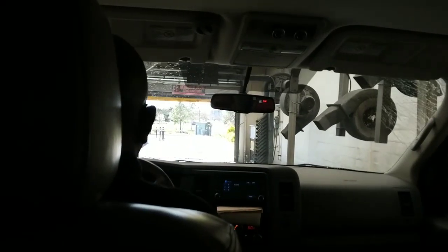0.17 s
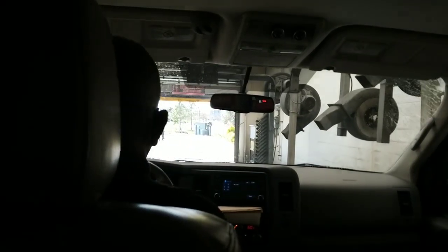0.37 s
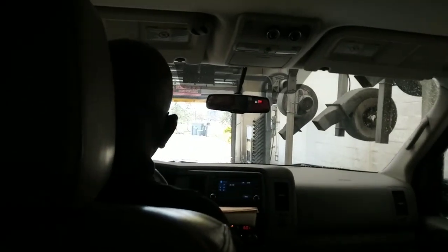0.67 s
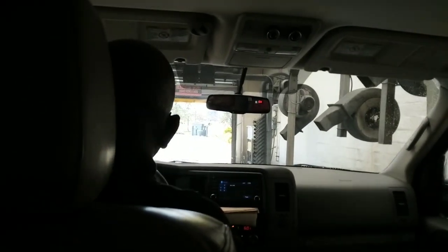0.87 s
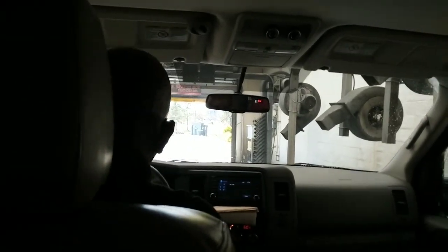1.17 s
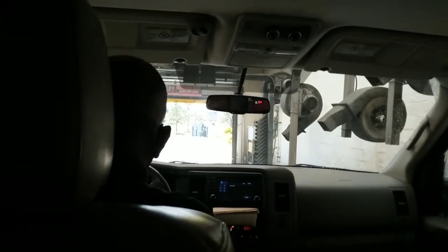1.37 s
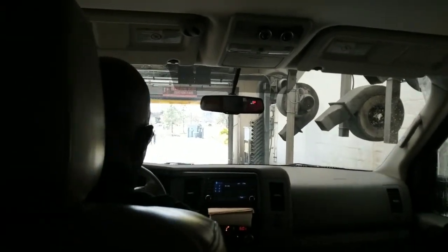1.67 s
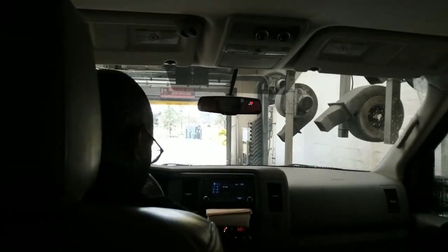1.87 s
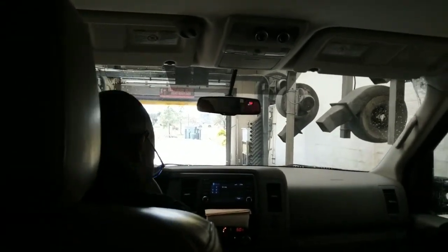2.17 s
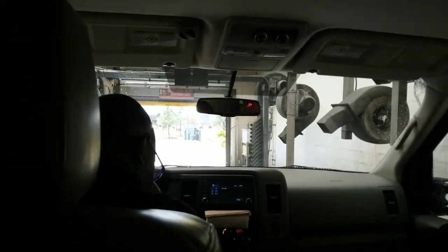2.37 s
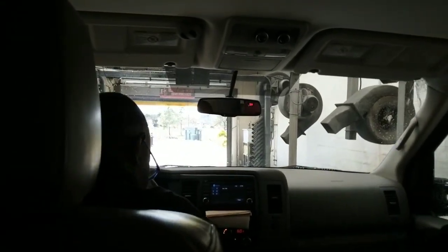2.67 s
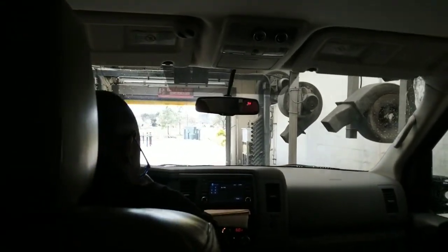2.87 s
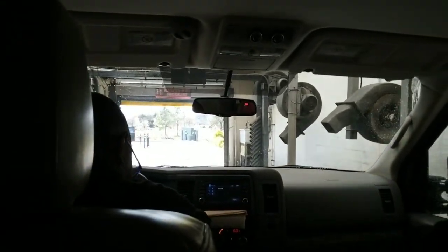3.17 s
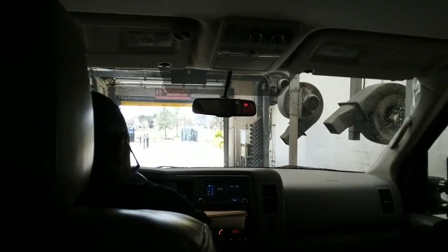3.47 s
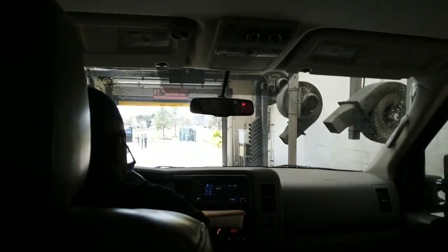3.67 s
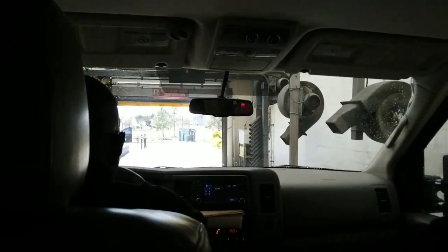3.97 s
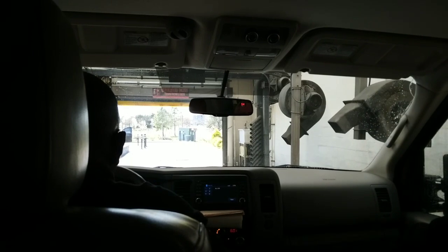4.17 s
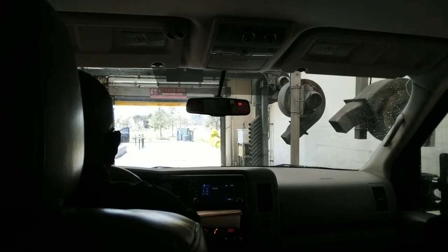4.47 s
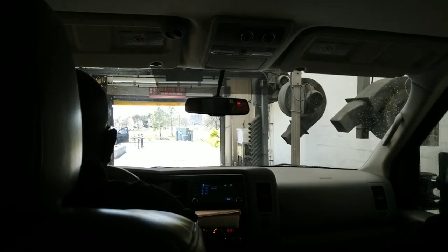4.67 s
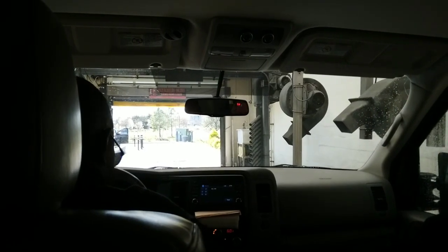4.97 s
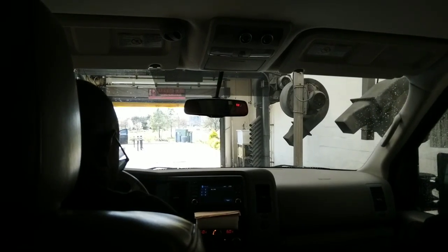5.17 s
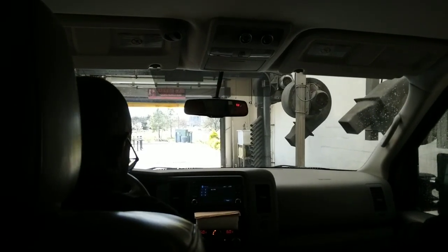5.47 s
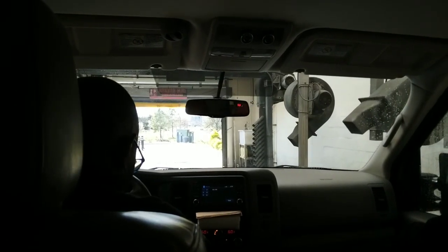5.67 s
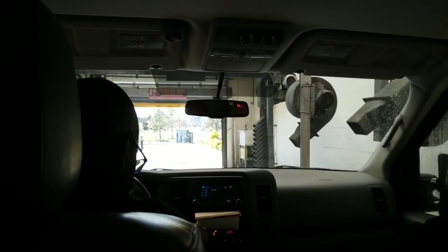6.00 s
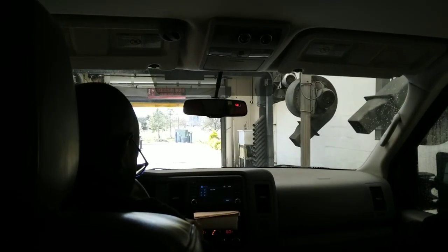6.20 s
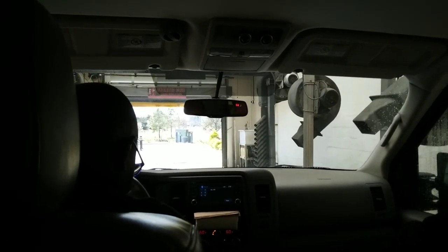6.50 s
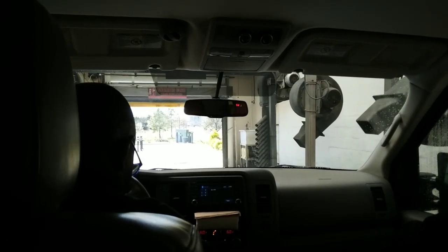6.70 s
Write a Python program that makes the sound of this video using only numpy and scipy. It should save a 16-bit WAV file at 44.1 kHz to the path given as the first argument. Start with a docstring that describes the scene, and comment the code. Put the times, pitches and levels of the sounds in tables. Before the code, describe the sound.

Large car wash dryer blowers roar without a break, heard from the back seat of a closed car. The sound is deep and muffled: air drums on the body and booms in the cabin, with a wavering fan hum and a much softer hiss through the glass. A faint high whistle slides up and fades between about 0.2 and 0.6 seconds. Gusts make the cabin air throb, most strongly around 1 and 1.7 seconds. Loose plastic trim rattles lightly in short, slightly squeaky bursts from about 0.6 seconds, busiest between 3 and 4.5 seconds. Something small ticks faintly and irregularly on the left throughout. The roar eases a little through the middle and dips briefly near 4.9 seconds. From about 6 seconds it swells with more throbs and is loudest at the end, near 6.8 seconds.

```python
"""Dryer blowers of a tunnel car wash roar over a closed car, heard by a phone on the back seat.
Their air jets drum on the body, boom in the cabin and hiss through the glass; the fan blades hum.
A faint whistle comes and goes, gusts make the cabin air throb, something small ticks on the left,
and loose trim rattles in bursts. The phone turns down the loudest swells."""
import sys
import numpy as np
from scipy import signal
from scipy.fft import rfft, irfft, next_fast_len
from scipy.io import wavfile
from scipy.ndimage import uniform_filter1d, minimum_filter1d

SR = 44100
rng = np.random.default_rng(int(sys.argv[2]) if len(sys.argv) > 2 else 0)


def log_audio(samples):
    """Write samples as a 16-bit WAV file to the path given in sys.argv[1]."""
    # one column per channel
    frames = np.atleast_2d(samples).T
    # limit to full scale, then quantise
    limited = np.clip(frames, -1, 1)
    pcm = np.round(limited * 32767).astype(np.int16)
    wavfile.write(sys.argv[1], SR, pcm)


N = 301644

# the car creeps through the jets: t/s, boom level/dB, roar level/dB, hiss level/dB
JET_LEVELS = [(0.0, -13.5, -14, -42), (0.2, -15, -13, -41.5), (0.45, -11.5, -10, -40.5),
              (0.75, -13, -10, -42), (1.0, -11.5, -7.5, -39.5), (1.45, -12.5, -9, -40.5),
              (1.8, -11.5, -9.5, -39.5), (2.2, -14, -11.5, -39.5), (2.7, -14, -11, -40.5),
              (3.0, -14.5, -12, -39), (3.4, -13.5, -11, -38), (4.2, -14.5, -13.5, -38.5),
              (4.8, -14, -12.5, -38.5), (4.92, -16.5, -17.5, -39.5), (5.05, -15, -12, -38.5),
              (5.5, -14.5, -13.5, -38.5), (5.65, -13.5, -10, -39), (6.0, -15.5, -10.5, -38.5),
              (6.35, -12.5, -7, -37.5), (6.8, -9, -5, -35)]
# slow swells above and below the roar: t/s, drone level/dB, rumble level/dB
SLOW_SWELLS = [(0, -28.5, -24), (.5, -24.5, -25.5), (1.0, -21.5, -26.5), (1.35, -24, -26),
               (1.7, -23.5, -24.5), (2.3, -24.5, -24), (2.9, -24.5, -23), (3.6, -23, -23.5),
               (4.2, -24.5, -25), (4.8, -25.5, -25.5), (5.3, -25.5, -21.5), (5.7, -24, -21.5),
               (6.1, -22.5, -26.5), (6.5, -20, -22), (6.84, -19.5, -24.5)]
# resonances (favourite pitches) of the cabin and of the panels: f/Hz, width/Hz, level/dB
CABIN_BOOM = [(97, 32, 0), (81, 16, -6), (113.4, 20, -4)]
PANEL_ROAR = [(142.8, 24, -1), (159.8, 24, -1), (192.8, 36, 0), (238.7, 28, -4), (284.7, 44.2, -5),
              (324.9, 37, -9)]
# tone colours of the deep rumble, dull drone and bright hiss: f/Hz, level/dB
RUMBLE_COLOUR = [(8.8, -43.5), (15, -15), (24, -9), (32, -5.5), (54, -6.5), (70, -4), (91, -31.5),
                 (150, -120)]
DRONE_COLOUR = [(200, -31), (340, -3), (404, -6.5), (461, -6.5), (556, -10), (693, -11), (852, -18),
                (1100, -37.5), (1430, -56.5), (2420, -120)]
HISS_COLOUR = [(600, -28.5), (900, -4), (1080, -3.5), (1400, -5.5), (1700, -8), (2400, -12), (2800, -13.5),
               (3400, -13), (3800, -15.5), (4190, -19), (5740, -26.5), (6610, -28.5), (8210, -34),
               (9660, -46), (11500, -55.5), (15500, -58.5)]
# how alike the two microphones sound: f/Hz, likeness (-1 to 1)
MIC_LIKENESS = [(25, .99), (60, .985), (130, .95), (290, .83), (640, .47), (1100, 0), (1600, -.05),
                (3100, .07), (6800, -.05), (12000, .3)]
# how much louder the left one is: f/Hz, level/dB
LEFT_EXTRA = [(30, 0), (80, 0), (130, .9), (250, -.6), (700, -.4), (1300, -1.5), (2400, .8), (4400, 1.5),
              (6600, 4), (9000, -1)]
# the fan blades' tone and its octave: f/Hz, level/dB halfway through
BLADE_TONES = [(467.5, -35.5), (936, -57)]
# strongest throbs of the cabin air: t/s of the peak, f/Hz, level/dB
AIR_THROBS = [(.42, 97.3, -6.5), (.51, 91.8, -9), (.72, 87, -9.5), (.91, 100.4, -5.5), (1.02, 98.8, -3),
              (1.27, 182, -6.5), (1.4, 104, -9), (1.55, 95.8, -8.5), (1.65, 140.5, -8.5), (1.72, 96.5, -3),
              (2.0, 94.3, -8.5), (2.17, 98, -7.5), (2.56, 92.3, -10), (2.9, 96, -8), (3.08, 86, -10.5),
              (3.479, 110.4, -12.5), (3.66, 84, -11), (3.9, 148.7, -8.5), (4.33, 84.5, -10),
              (5.62, 90, -11.5), (5.92, 97, -10.5), (6.06, 100, -6), (6.21, 99.4, -9.5), (6.34, 95.7, -3),
              (6.65, 98.3, -7)]
# loudest ticks: t/s, level/dB
LOUD_TICKS = [(0.4305, -42), (0.8725, -47), (1.0311, -36), (1.0511, -40), (1.1598, -45), (1.172, -34),
              (1.297, -38), (1.3728, -43), (1.563, -35), (1.7145, -39), (1.8098, -39), (1.9151, -38),
              (2.3262, -43), (2.4145, -43), (2.439, -37), (2.61, -38), (2.7851, -40), (2.7981, -34),
              (3.0485, -38), (3.2017, -40), (3.2645, -39), (3.2895, -37), (3.485, -35), (3.5903, -36),
              (3.6302, -44), (3.712, -41), (4.2463, -44), (4.3211, -40), (4.7621, -44), (4.7746, -37),
              (4.8365, -47), (5.0579, -38), (5.0994, -40), (5.3438, -38), (5.5977, -39), (5.6616, -46),
              (5.6965, -41), (5.7813, -41), (5.907, -39), (5.9549, -41), (5.9998, -38), (6.0687, -39),
              (6.15, -41), (6.1654, -37), (6.2248, -41), (6.2383, -36), (6.2687, -37), (6.3316, -38),
              (6.361, -34), (6.4004, -38), (6.5381, -38), (6.5528, -33), (6.6723, -38), (6.7072, -37),
              (6.7376, -33)]
# bursts of rattling: t/s, shake level/dB, clear ring level/dB
RATTLE_BURSTS = [(0.6494, -48, -49), (0.8, -49, -41), (0.887, -43.5, -40), (0.909, -49, -38),
                 (0.975, -55, -48), (1.052, -43, -40), (1.067, -46, -46), (1.081, -46, -46),
                 (1.102, -42, -37), (1.17, -49.5, -38), (1.234, -52, -43), (1.3017, -51, -46),
                 (1.326, -50, -46), (1.345, -59, -44), (1.41, -56.5, -39), (1.45, -48, -37.5),
                 (1.499, -43, -36), (1.608, -48, -38), (1.677, -44, -55.5), (1.8402, -43.5, -44),
                 (1.901, -48, -44), (1.9232, -47, -46), (1.951, -47, -45), (2.0348, -42, -34),
                 (2.204, -41.5, -37), (2.102, -50, -46), (2.119, -50.5, -46.5), (2.448, -48, -47),
                 (2.6356, -49, -41), (2.6533, -47, -37), (2.7104, -49, -48), (2.8002, -50, -46),
                 (2.8496, -46, -45), (2.9593, -50, -42), (2.975, -51, -40), (3.005, -41.5, -35),
                 (3.218, -38.5, -28.5), (3.2574, -44, -42), (3.272, -50, -36), (3.302, -54, -42),
                 (3.318, -53, -37), (3.334, -56, -38), (3.35, -55, -39), (3.375, -49, -35),
                 (3.3946, -41.5, -34), (3.412, -47, -30), (3.44, -43.5, -35), (3.482, -38.5, -42),
                 (3.497, -41, -39), (3.53, -45, -38), (3.555, -49, -44), (3.634, -48, -43),
                 (3.644, -47, -42), (3.671, -49.5, -48), (3.705, -48, -47), (3.7414, -45, -44),
                 (3.764, -47.5, -44), (3.781, -50, -47), (3.793, -49, -43), (3.853, -50, -45),
                 (3.884, -46, -42), (3.919, -41.5, -33), (3.956, -45, -44), (3.992, -47, -43),
                 (4.026, -49, -48), (4.3167, -47, -48), (4.3677, -39.5, -32), (4.381, -51, -43),
                 (4.452, -52, -37), (4.5, -48.5, -40), (4.553, -53, -45.5), (4.5777, -53, -48),
                 (4.6365, -47, -39), (4.676, -46, -46), (4.8306, -49, -46), (4.8426, -44, -40),
                 (4.934, -44, -41), (5.096, -48, -54), (6.1626, -49, -49), (6.277, -41, -44),
                 (6.3062, -49, -48), (6.405, -43.5, -31), (6.496, -45.5, -44), (6.677, -49, -45)]
# the trim's clatter, clear ring and dry crack: f/Hz, time to fade 60 dB/s, left level/dB, right level/dB
CLATTER_RINGS = [(1185, 0.014, -3.5, -4), (1235, 0.023, -3.5, -2), (1413, 0.021, -5.5, -1),
                 (1880, 0.0094, 0, -0.5), (2110, 0.059, -14.5, -13.5), (2360, 0.0083, -4, -7.5),
                 (2690, 0.015, -7.5, -11), (3120, .014, -9, -13.5), (3480, 0.0039, -10, -13)]
CLEAR_RINGS = [(1610, 0.09, -12.5, -7), (1665, .03, -24, -20)]
CRACK_RINGS = [(4700, 0.0081, -0.5, -3.5), (6980, 0.0066, 6.5, -3.5), (8250, .004, -11.5, -10.5)]


def undb(db):
    """Turn decibels into a number to multiply by."""
    return 10 ** (np.asarray(db) / 20)


def look_up(table, hz):
    """Read a table by frequency, with octaves evenly spaced."""
    at, value = np.transpose(table)
    return np.interp(np.log(hz), np.log(at), value)


def wander(per_s):
    """A smooth random wobble, typically of size 1, with per_s new values a second."""
    hold = int(SR / per_s)
    steps = np.repeat(rng.standard_normal(N // hold + 1), hold)
    smooth = uniform_filter1d(uniform_filter1d(steps, hold), hold)[:N]
    return smooth / np.sqrt(np.mean(smooth ** 2))


def colour(table):
    """Strength at each frequency, silent beyond the table's ends."""
    return lambda hz: undb(look_up(table, hz)) * (hz > table[0][0]) * (hz < table[-1][0])


def resonances(table):
    """Strength at each frequency for a set of steep peaks."""
    return lambda hz: np.sqrt(sum(undb(db) ** 2 / (1 + ((hz - centre) * 2 / width) ** 2) ** 2
                                  for centre, width, db in table))


def air_noise(gain_at, flicker_db, per_s, bands_hz):
    """Noise reaching two microphones from all around; each band flickers on its own."""
    size = next_fast_len(N)
    hz = np.maximum(np.arange(size // 2 + 1) * SR / size, 1)
    alike = np.clip(look_up(MIC_LIKENESS, hz), -1, 1)
    mid, side = rfft(rng.standard_normal((2, size))) * gain_at(hz)
    mid, side = mid * np.sqrt(1 + alike), side * np.sqrt(1 - alike)
    mics = np.array([mid + side, mid - side]) * undb(np.outer([.5, -.5], look_up(LEFT_EXTRA, hz)))
    left_early_s = .00006
    mics = mics * np.exp(1j * np.pi * left_early_s * np.outer([1, -1], hz))
    place = np.interp(np.log(hz), np.log(bands_hz), np.arange(len(bands_hz)))
    noise = 0
    for band in range(len(bands_hz)):
        share = np.cos(np.clip(place - band, -1, 1) * np.pi / 2) ** 2
        noise += undb(flicker_db * wander(per_s)) * irfft(mics * share, size)[:, :N]
    return noise / np.sqrt(np.mean(noise.mean(axis=0) ** 2))


def gains_over_time(table):
    """One volume curve for each level column of a table."""
    times, *levels = np.transpose(table)
    return [undb(np.interp(np.arange(N) / SR, times, db)) for db in levels]


def air_jets():
    """Swirling air beats on the roof and glass, making five layers of noise from low to high."""
    boom, roar, hiss = gains_over_time(JET_LEVELS)
    drone, rumble = gains_over_time(SLOW_SWELLS)
    return (rumble * air_noise(colour(RUMBLE_COLOUR), flicker_db=.35, per_s=3.6, bands_hz=[20, 60])
            + boom * air_noise(resonances(CABIN_BOOM), 1.2, 12, [80, 120])
            + roar * air_noise(resonances(PANEL_ROAR), .93, 12, [150, 220, 300])
            + drone * air_noise(colour(DRONE_COLOUR), 1.3, 10, [400, 600, 900])
            + hiss * air_noise(colour(HISS_COLOUR), 1.1, 9, [1000, 1600, 2500, 4000, 6500, 10000]))


def fan_hum():
    """Spinning blades make a wavering hum that grows as the car nears the fans."""
    nearing_db = .9 * (np.arange(N) - N / 2) / SR  # 0.9 dB louder each second
    hum = 0
    for hz, db in BLADE_TONES:
        pitch = hz * (1 + .003 * wander(6))
        gain = undb(db + nearing_db + 2.5 * wander(6))
        hum += gain * np.sqrt(2) * np.sin(2 * np.pi * np.cumsum(pitch) / SR)
    return hum


def whistle():
    """A faint whistle swells while its pitch slides up and settles, then fades."""
    start_s, length_s, swell_s, settle_s = .18, .42, .07, .06
    age = np.maximum(np.arange(N) / SR - start_s, 0)
    fade_in_out = np.clip(np.minimum(age, length_s - age) / swell_s, 0, 1)
    gain = fade_in_out * undb(-43 - 8 * age / length_s)
    hz = 2550 - 230 * np.exp(-age / settle_s)
    mics = np.array([[1], [-.4]])  # the right is weaker and swings the opposite way
    return mics * gain * np.sin(2 * np.pi * np.cumsum(hz) / SR)


def cabin_throbs():
    """Gusts set the cabin air swinging: each low note quickly swells and sinks."""
    t, swell_s = np.arange(N) / SR, .033
    skew = np.array([[.12], [-.12]])  # radians: the left is slightly ahead
    throbs = 0
    for peak_s, hz, db in AIR_THROBS:
        swell = undb(db) * np.exp(-((t - peak_s) / swell_s) ** 2 / 2)
        phase = 2 * np.pi * (hz * (t - peak_s) + rng.random())
        throbs += swell * np.sin(phase + skew)
    return throbs


def knocks(per_s, scatter_db):
    """Random knocks, mostly weak, a few strong."""
    chance, size, sign = rng.random((3, N))
    return (chance < per_s / SR) * undb(-scatter_db * np.log(size + .043)) * np.sign(sign - .5)


def ring(blows, hz, fade_s):
    """A struck part rings at one pitch, dying away by 60 dB in fade_s."""
    decay, turn = np.exp(-np.log(1000) / (fade_s * SR)), 2 * np.pi * hz / SR
    return signal.lfilter([0, np.sin(turn)], [1, -2 * decay * np.cos(turn), decay ** 2], blows)


def small_ticks(shaking):
    """Something small on the left ticks on the peaks of the cabin's shaking, at random and at set times."""
    slow_shaking = signal.sosfilt(signal.butter(2, 160, fs=SR, output="sos"), shaking)
    peaks = signal.find_peaks(slow_shaking)[0]
    blows = undb(-66.5) * knocks(per_s=300, scatter_db=2)
    blows[peaks] += undb(-53 + 6.4 * rng.standard_normal(N).clip(-3, 1.5))[peaks]
    for start_s, db in LOUD_TICKS:
        blows[int(start_s * SR)] += undb(db)
    tick_hz = 6536
    tick = ring(signal.unit_impulse(SR // 50), tick_hz, fade_s=.0062)
    tick = ring(tick, tick_hz, fade_s=.0017)  # a second ring softens the start
    mics = undb([[0], [-19.5]])
    return np.convolve(blows, tick / tick.max())[:N] * mics / mics.mean()


def trim_rattles():
    """Loose trim knocks, then chatters and dies away; a weak chatter never stops."""
    # three rows: clatter, clear ring, crack
    shake = undb(np.array([[-66], [-58], [-68]]) + 2.7 * wander(13))
    age = np.arange(SR // 4) / SR
    burst_s, linger_s, crack_below_db = .018, .052, 16.5
    patter = undb(-15) * np.exp(-age / linger_s)  # too weak to sound the clear ring
    fade = np.exp(-(age / burst_s) ** 2) + np.outer([1, 0, 1], patter)
    # parts on either side chatter separately, so left and right share only some knocks
    chatter = .4 * knocks(1500, 2.1) + .79 * np.array([knocks(1500, 3), knocks(1500, 1.3)])
    for start_s, shake_db, clear_db in RATTLE_BURSTS:
        start = int(start_s * SR)
        strength = undb([[shake_db], [clear_db], [shake_db - crack_below_db]])
        shake[:, start:start + len(age)] += strength * fade[:, :N - start]
        chatter[:, start] += 2.3  # the first knock
    # plastic is soft, so its knocks lack the highest treble
    chatter = signal.sosfilt(signal.butter(6, 9000, fs=SR, output="sos"), chatter)
    # the clear ring is partly a squeak: rubbing that keeps step with its own swing
    squeak_hz = CLEAR_RINGS[0][0] * (1 + .004 * wander(25))
    squeak = undb(-45) * np.sin(2 * np.pi * np.cumsum(squeak_hz) / SR)
    pushes = (chatter, undb(-5) * chatter + squeak, chatter)
    rattle = 0
    for force, push, rings in zip(shake, pushes, (CLATTER_RINGS, CLEAR_RINGS, CRACK_RINGS)):
        for hz, fade_s, *mic_db in rings:
            rattle += undb(mic_db)[:, None] * ring(force * push, hz, fade_s)
    return rattle


def scene():
    """Everything heard inside the car."""
    air = air_jets() + cabin_throbs()
    return air + fan_hum() + whistle() + trim_rattles() + small_ticks(air[0])


def record(dry):
    """The phone turns down just ahead of loud peaks, clips what is left and cuts the highest treble."""
    span, ceiling, top_hz = int(.0045 * SR), 1.155, 15500
    allowed = np.minimum(1, ceiling / (np.abs(dry).max(axis=0) + 1e-9))
    gain = minimum_filter1d(allowed, span)
    gain = uniform_filter1d(uniform_filter1d(gain, span // 2), span // 2)
    clipped = np.clip(dry * gain, -1, 1)
    return signal.sosfilt(signal.ellip(8, .1, 70, top_hz, fs=SR, output="sos"), clipped)


dry = scene()
out = record(dry)
log_audio(out)
```